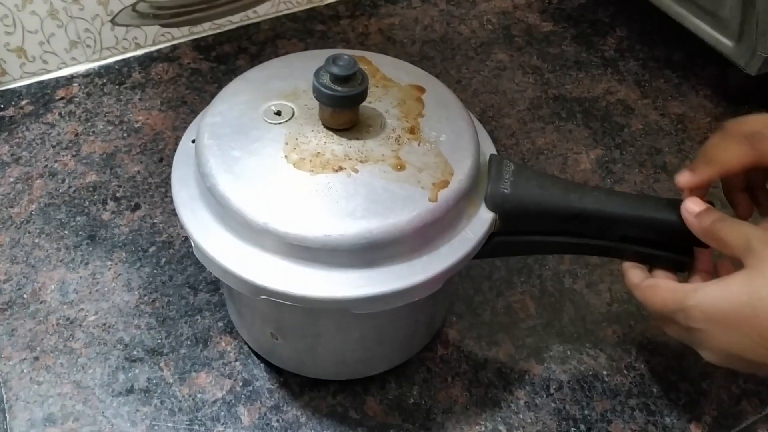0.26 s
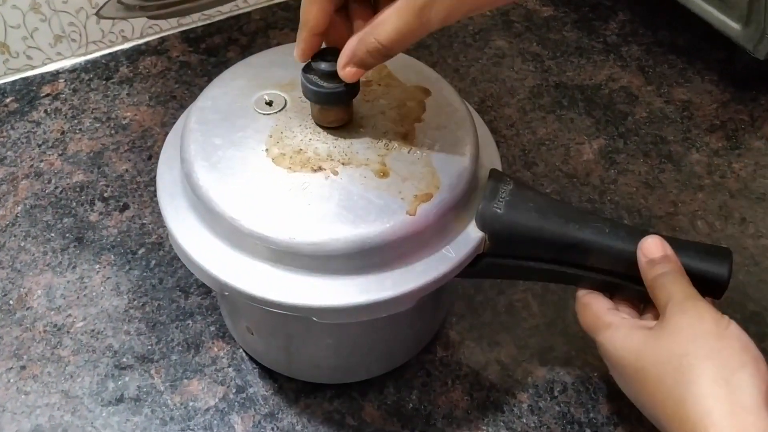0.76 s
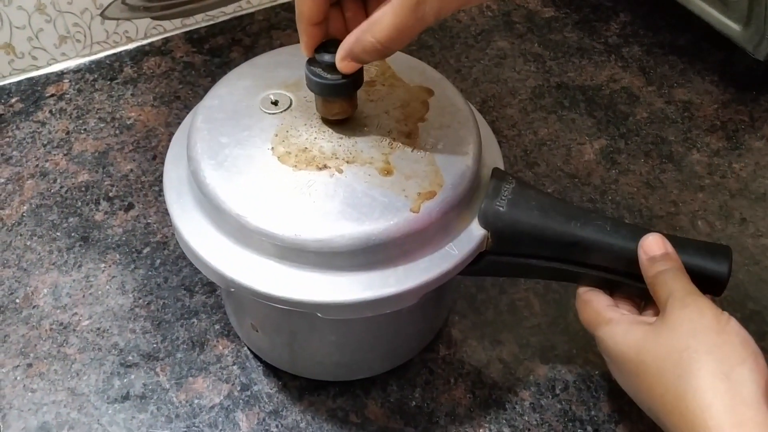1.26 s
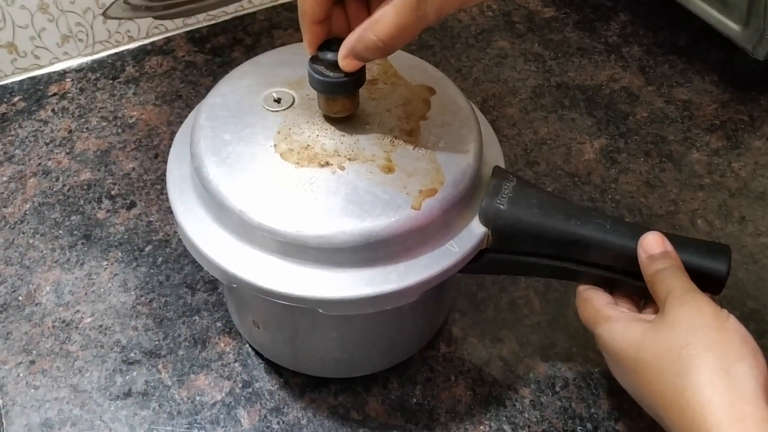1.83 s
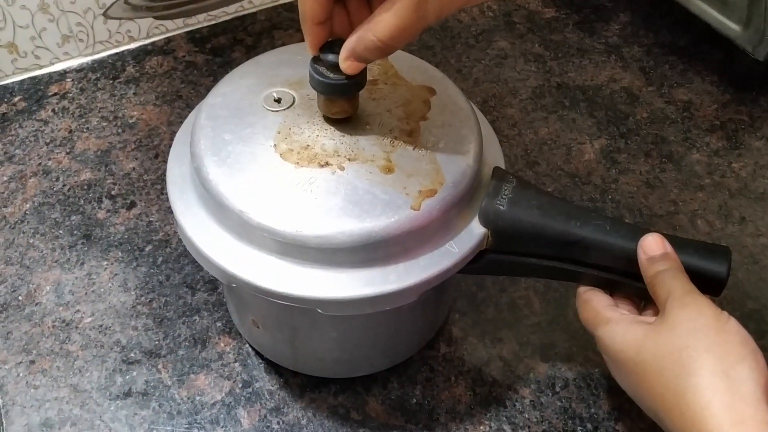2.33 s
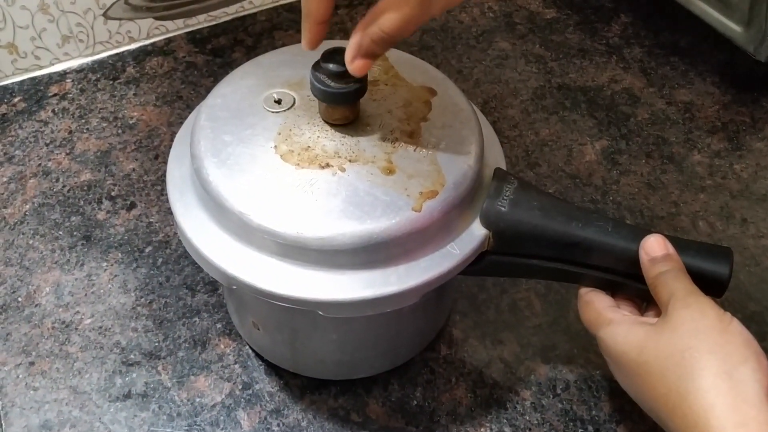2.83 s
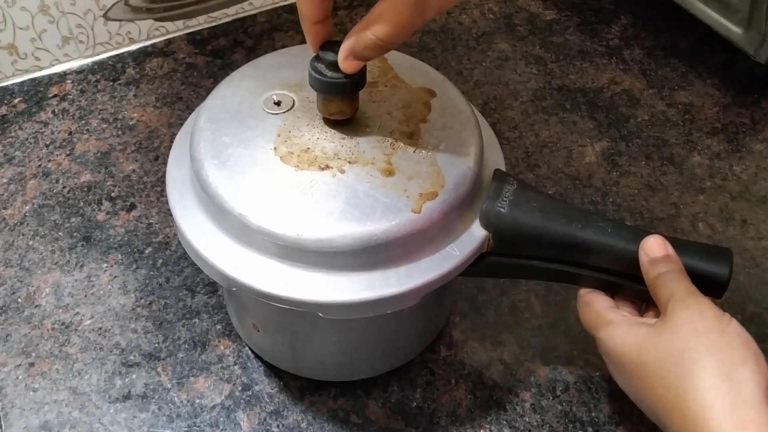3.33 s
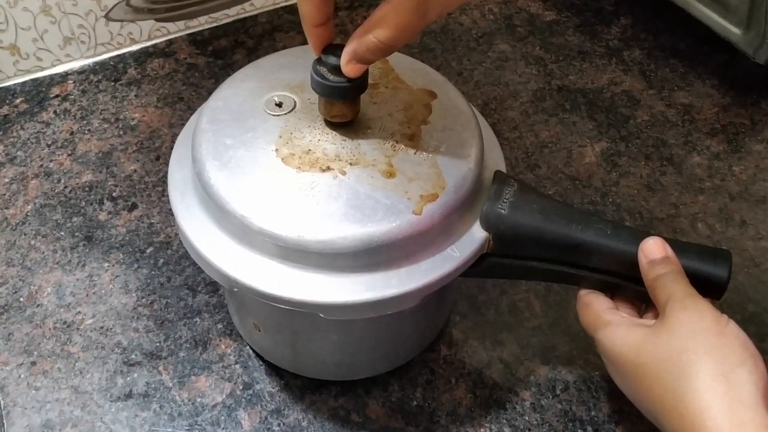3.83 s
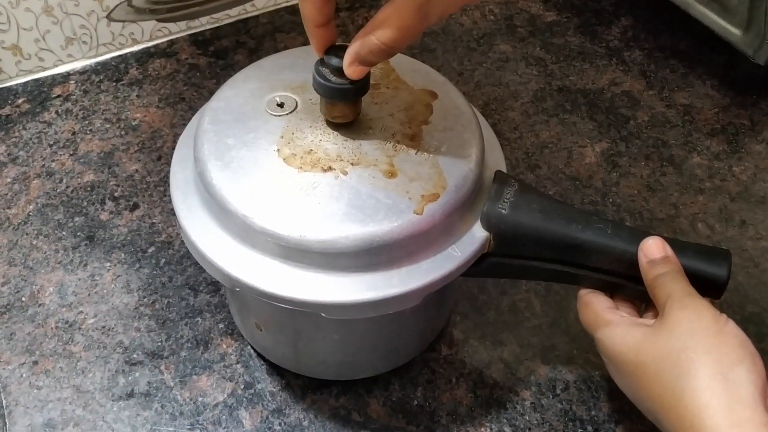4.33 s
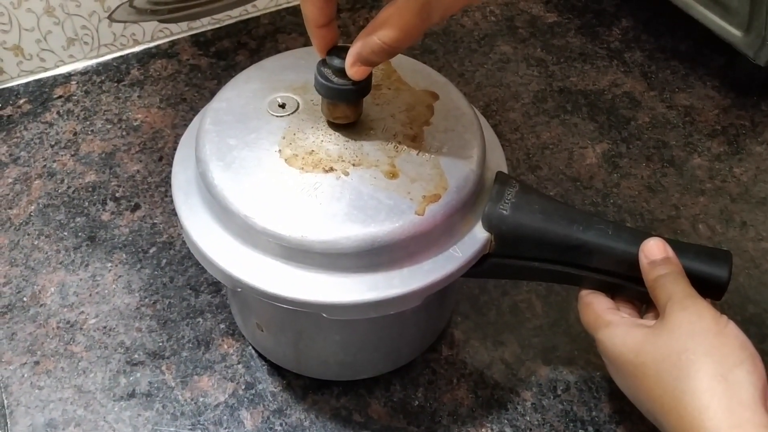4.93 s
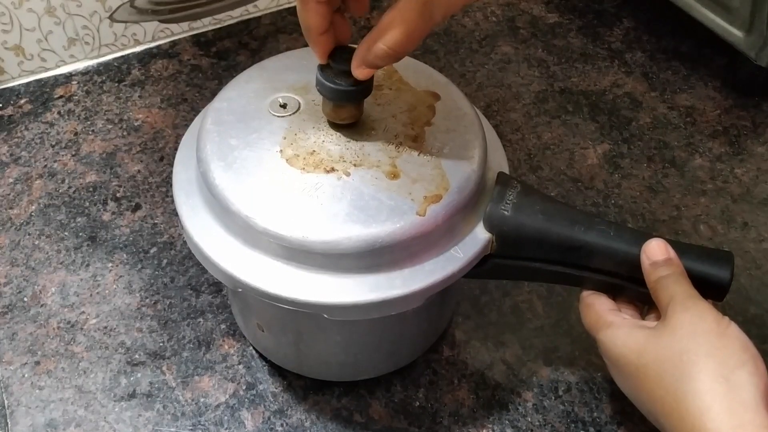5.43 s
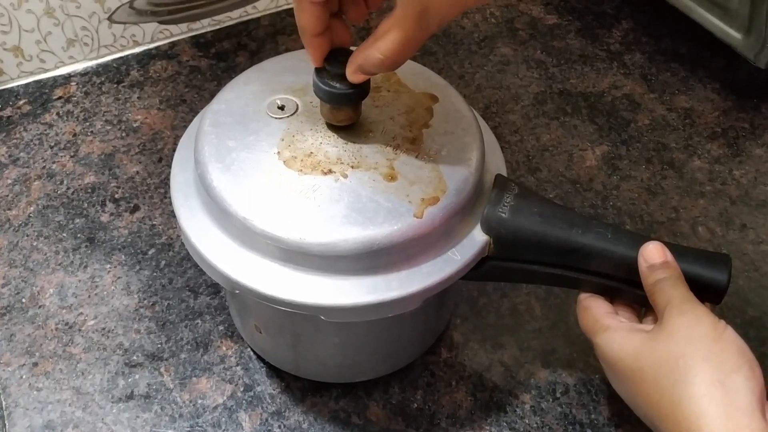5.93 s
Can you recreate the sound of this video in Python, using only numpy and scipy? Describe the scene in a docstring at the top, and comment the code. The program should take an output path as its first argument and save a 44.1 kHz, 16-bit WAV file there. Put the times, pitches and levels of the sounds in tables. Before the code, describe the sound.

In a kitchen, a pressure cooker seeps faintly until its weight is lifted with a click and a bright jet of steam hisses out, steadily fading. The weight drops back with a metallic clunk that briefly rings the lid. After a short pause a second, softer hiss starts and quickly dwindles to a thin, wavering stream with a few tiny spits. The microphone is close, with a low room drone behind.

```python
"""A kitchen counter, with a hand-held mono microphone close to a pressure cooker.
At first a little steam seeps under the seated weight. About a second in, fingers lift the weight:
a turbulent jet hisses from the vent and fades as the pressure falls. The weight drops back with a
clunk that rings the lid. Just after three seconds it is lifted again, and the rest of the steam
runs out, ending in a few spits over the low drone of the kitchen."""
import sys
import numpy as np
from scipy import signal
from scipy.fft import rfft, irfft
from scipy.io import wavfile

SR = 44100
rng = np.random.default_rng(int(sys.argv[2]) if len(sys.argv) > 2 else 0)


def transcribe(signal):
    """Save signal, clipped to [-1, 1], as a 16-bit WAV file at the path in sys.argv[1]."""
    frames = np.atleast_2d(signal).T
    limited = np.clip(frames, -1, 1)
    pcm = np.round(limited * 32767).astype(np.int16)
    wavfile.write(sys.argv[1], SR, pcm)


N = 272097
TIME, BINS = np.arange(N) / SR, np.fft.rfftfreq(N, 1 / SR)
CUT_HZ = 15750

# Lifts of the weight. Each row: lifted, seated again and time to open in seconds, relative level in dB,
# fall in dB per second, top sizzle in dB, ring of the vent pipe in dB.
WEIGHT_LIFTS = [(0.971, 2.621, 0.045, -25, 12.5, -1.5, 0.8), (3.1, 6.5, 0.04, -34, 23.5, -1, -1.44)]
# The bare jet. Each row: frequency in Hz, relative level in dB.
JET_COLOUR = [(60, -49), (200, -28.5), (400, -23.5), (700, -27), (1000, -23), (1600, -23.5), (2800, -16),
              (5000, -12), (7000, -11), (10000, -7.5), (13000, -3.5), (15500, -10.5)]
# Resonances of the vent, the hollow weight and the space above the lid.
# Each row: centre and width in Hz, boost in dB.
VENT_RESONANCES = [(1349, 400.0, 7.9), (1856, 190.0, 5.8), (2164, 210.0, 2.6), (2430, 180.0, 7.9),
                   (2834, 60.0, 3.0), (3218, 240.0, 6.1), (3548, 440.0, 8.9), (4502, 90.0, 4.6),
                   (5167, 110.0, 3.9), (5621, 120.0, 2.5), (5838, 60.0, 3.3), (6081, 120.0, 3.2),
                   (6618, 60.0, 3.2), (6817, 60.0, 3.2), (7338, 200.0, 5.0), (8601, 1500.0, 9.9),
                   (9265, 100.0, 3.1), (9470, 60.0, 1.9), (10426, 190.0, 3.0), (10808, 270.0, 2.2),
                   (11823, 530.0, 4.7), (12753, 1170.0, 5.3), (14011, 160.0, 3.1), (15283, 260.0, 2.7)]
# Whistles of the gap under the weight. Each row: centre and width in Hz, boost in dB per dB of rush.
WHISTLES = [(4540, 52, 0.94), (5200, 140, 0)]
# The weight tips in the fingers and lets more or less steam by.
# Each row: middle and length in seconds, change in dB.
WEIGHT_WOBBLES = [(1.61, 0.06, -0.9), (1.685, 0.03, 2), (3.52, 0.093, 2), (3.7, 0.32, 1.8),
                  (4.14, 0.13, -0.5), (4.93, 0.25, -1.5), (5.29, 0.16, 4), (5.49, 0.28, -2.5),
                  (6.02, 0.13, -3.5)]
# The weight hangs low and steam rushes through a narrow gap.
# Each row: start and end in seconds, rush and top sizzle in dB.
GAP_PINCHES = [(0.93, 1.063, 5.5, 5), (2.423, 2.7, 6.5, 4), (3.05, 3.14, 6, 8), (4.46, 5.18, 3.5, 2)]
# Spits of the dying jet. Each row: start in seconds, relative level in dB.
JET_SPITS = [(5.1, -57), (5.62, -58), (6.047, -56)]
# A weaker jet is duller. Each row: jet strength in dB, dullness in dB per octave,
# then pipe ring, gap rush and top sizzle in dB.
JET_TONES = [(-70, 5, 2, 2, 0.5), (-51, 1.15, 2, -0.5, -2), (-40.5, 1, -1, -2, 2), (-30.5, 0.5, 0.5, -2, 0),
             (-26.5, 0, 6, -1.5, -1)]
# The weight knocks on its stem. Each row: start in seconds, relative level, pot thud and bright tick
# in dB, favoured lid frequency in Hz, its boost in dB.
WEIGHT_KNOCKS = [(0.035, -66, -18, -22, 2450, 20), (0.511, -67, -15, 13, 1310, 3),
                 (1.008, -37.5, -8.5, 5, 740, -7), (2.4717, -44, -34.5, -22.5, 1516, 27),
                 (2.548, -44.5, 1.5, -20, 484, 17), (2.5872, -33, -6.5, 3, 1040, 1),
                 (2.599, -59, 8, -15, 1770, 14), (2.609, -51, 10, -15, 1000, 0),
                 (2.629, -53, -12, -15, 1900, 19), (3.048, -53, -12, -26, 1400, 8.5),
                 (3.1077, -49.5, -16, 11, 1310, 17), (3.153, -62, 18.5, -20, 430, 0),
                 (4.181, -62, -8, -15, 430, 4)]
# Modes of lid and weight. Each row: frequency in Hz, relative level in dB, seconds to fall 60 dB.
LID_MODES = [(434, -9, 0.14), (533, -15, .15), (740, -5, 0.17), (804, -9.5, 0.24), (971, 3, 0.082),
             (1157, 2, 0.073), (1287, -10.5, .11), (1389, -8.5, 0.13), (1590, -9.5, 0.18), (1830, 5, 0.11),
             (1950, -8.5, 0.18), (1800, -9, 0.15), (1990, -8, 0.19), (2244, -3, 0.12), (2600, -4.5, 0.083),
             (2480, -10, .11), (2630, -8.5, 0.066), (3015, -15.5, .16), (4540, -18, 0.13)]
# A knock's clack, the thud of the pot on the counter, and the tick of metal meeting metal.
# Each row: frequency in Hz, relative level in dB.
CLACK_COLOUR = [(100, -1.5), (400, 9), (1100, 3.5), (2500, 8), (3300, -13.5), (5000, -13), (7000, -14),
                (15000, -21)]
THUD_COLOUR = [(60, -18), (150, 5), (260, 1.5), (420, -9), (800, -2), (2000, -40.5)]
TICK_COLOUR = [(500, -10), (3300, -14.5), (4900, 7), (6000, -5), (7200, -6.5), (15000, -15)]
# The airy band above the hollow note swells once. Each row: middle and length in seconds, rise in dB.
AIRY_SWELL = [(1.88, 0.33, 13)]
# Seeping steam, kitchen background and microphone rumble. Each row: frequency in Hz, relative level in dB.
SEEP_SPECTRUM = [(500, -1), (1000, -7), (1700, -7), (2450, -1), (3000, -5), (4500, -0.5), (6500, -3),
                 (7600, -2.5), (10500, 1), (13500, -1), (15500, -0.5)]
KITCHEN_SPECTRUM = [(10, -16), (22, 2.5), (35, -2.5), (65, -7), (150, -8), (230, -8), (330, -4), (450, -10),
                    (600, -17), (1000, -24), (1700, -29), (3500, -30.5), (8000, -32.5), (15500, -35)]
RUMBLE_SPECTRUM = [(5, -16), (15, 3.5), (22, -5), (30, -24.5), (42, -27), (80, -17), (200, -52),
                   (1000, -80.5)]
# Resonances of the kitchen's drone. Each row: centre and width in Hz, boost in dB.
DRONE_RESONANCES = [(43.5, 19, 2.4), (96.4, 18.3, 12.6), (124, 10, 2.7), (181.6, 6.8, 14.3),
                    (247.7, 14, 2.4), (362, 3.4, 6.6), (414, 7.8, 1.9), (764, 19, 2.6), (1400, 90, 4),
                    (2870, 250, 6)]
# The hand moves on the microphone. Each row: middle and length in seconds, rise in dB.
MIC_HANDLING = [(0.22, 0.4, 12), (2.7, 0.3, 10)]
# The kitchen's reverberation. Each row: frequency in Hz, seconds to fall 60 dB.
ROOM_DECAY = [(150, 0.64), (1000, 0.3), (3000, 0.25), (8000, 0.23), (15000, 0.22)]


def jet(flutter_db=0.5, flutter_hz=22, level_db=0.38, weak_share=0.71):
    """Turbulence at the vent, close to the microphone; it flutters and dulls as the pressure falls."""
    hz, t, white = signal.stft(rng.standard_normal(N), SR, nperseg=1024, noverlap=768)
    strength = steam_flow()
    dull, pipe, gap, sizzle = jet_tone(t, strength)
    octaves_down = np.log2(10000 / np.clip(hz, 800, 10000))
    # a weak jet rings the vent less clearly
    clarity = np.interp(np.interp(t, TIME, strength), amp([-59, -50]), [weak_share, 1])[:, None]
    db = spectrum(JET_COLOUR, hz) + clarity * peaks(VENT_RESONANCES, hz) + dull * octaves_down
    db += pipe * bell(3450, 1100, hz) + sizzle * bell(15000, 4400, hz)
    # as the weight sinks towards its seat, the slit rushes and starts to whistle
    db += gap * bell(5300, 3200, hz) + np.maximum(gap, 0) * peaks(WHISTLES, hz)
    # the flow sets the strength of the treble, whatever the colour
    treble = (hz > 7500) & (hz < 15500)
    colour = amp(db) / np.sqrt(np.mean(amp(db) ** 2 * treble, axis=1, keepdims=True))
    hiss = signal.istft(white * colour.T, SR, nperseg=1024, noverlap=768)[1][:N]
    return hiss * strength * amp(level_db + flutter_db * wander(flutter_hz))


def steam_flow(boil_db=-50, boil_fall_db_per_s=3.5, spit_t60=0.23):
    """Jet strength: stored steam runs out fast, the boiling slowly; spits and wobbles ride on top."""
    power = np.zeros(N)
    for lifted, seated, rise_s, db, fall, *_ in WEIGHT_LIFTS:
        age = np.maximum(TIME - lifted, 0)
        stored = amp(db - fall * age)
        boiling = amp(boil_db - boil_fall_db_per_s * age)
        power += vent_opening(lifted, seated, rise_s) ** 2 * (stored ** 2 + boiling ** 2)
    for start, db in JET_SPITS:
        add(power, start, amp(db - 60 * TIME / spit_t60) ** 2)
    return np.sqrt(power) * amp(swells(WEIGHT_WOBBLES))


def vent_opening(lifted, seated, rise_s, sink_s=0.087):
    """How far the vent is open, 0 to 1, as the weight rises and sinks back onto its seat."""
    return np.clip(np.minimum((TIME - lifted) / rise_s, (seated - TIME) / sink_s), 0, 1) ** 2


def jet_tone(t, strength, pinch_edge_s=0.019, pipe_per_rush=-0.68):
    """Dullness, pipe ring, gap rush and sizzle follow the jet's strength and the weight's height."""
    level = 20 * np.log10(np.interp(t, TIME, strength) + 1e-9)
    levels, *columns = np.transpose(JET_TONES)
    dull, pipe, gap, sizzle = (np.interp(level, levels, column) for column in columns)
    for lifted, seated, *_, sizzle_db, pipe_db in WEIGHT_LIFTS:
        held = (t > lifted) & (t < seated)
        sizzle += sizzle_db * held
        pipe += pipe_db * held
    for start, end, rush_db, sizzle_db in GAP_PINCHES:
        pinch = (np.tanh((t - start) / pinch_edge_s) - np.tanh((t - end) / pinch_edge_s)) / 2
        gap += rush_db * pinch
        sizzle += sizzle_db * pinch
        pipe += pipe_per_rush * rush_db * pinch
    return np.array([dull, pipe, gap, sizzle])[:, :, None]


def weight_knocks(focus_width_hz=260, clack_t60=0.095, tick_t60=0.032,
                  pot_hz=231.5, pot_t60=0.16, thud_t60=0.043, thud_rise_s=0.00089):
    """The weight clacks on its stem, rings the lid and, more slowly, shakes the whole pot."""
    t, out = np.arange(SR // 2) / SR, np.zeros(N)
    clack, thud, tick = (noise(spectrum(c, BINS)) for c in (CLACK_COLOUR, THUD_COLOUR, TICK_COLOUR))
    for start, db, thud_db, tick_db, favoured_hz, boost_db in WEIGHT_KNOCKS:
        phases = rng.uniform(0, 2 * np.pi, len(LID_MODES))
        span = round(start * SR) + np.arange(len(t))
        ring = np.zeros(len(t))
        for (hz, mode_db, t60), phase in zip(LID_MODES, phases):
            # where the blow lands decides which modes ring most
            struck_db = mode_db + boost_db * bell(favoured_hz, focus_width_hz, hz)
            ring += amp(struck_db - 60 * t / t60) * np.sin(2 * np.pi * hz * t + phase)
        pot = amp(-5 - 60 * t / pot_t60) * np.sin(2 * np.pi * pot_hz * (t + start))
        counter = thud[span] * amp(-10 - 60 * t / thud_t60)
        body = (pot + counter) * (1 - np.exp(-t / thud_rise_s))
        contact = clack[span] * amp(-8 - 60 * t / clack_t60)
        contact += tick[span] * amp(tick_db - 10 - 60 * t / tick_t60)
        add(out, start, amp(db) * (amp(-13) * ring + amp(thud_db) * body + contact))
    return out


def hollow_note(start_hz=758, end_hz=183.9, sink_s=0.66, grow_db_per_s=5,
                spread_hz=20, airy_ratio=1.25, airy_spread_hz=60):
    """In the first lift, a faint narrow noise band and an airy one above it sink with the pressure."""
    lifted, seated, rise_s, *_ = WEIGHT_LIFTS[0]
    age = np.clip(TIME - lifted, 0, seated - lifted)
    hz = end_hz + (start_hz - end_hz) * np.exp(-age / sink_s)
    phase = 2 * np.pi * np.cumsum(hz) / SR
    note = wander(spread_hz) * np.cos(phase) + wander(spread_hz) * np.sin(phase)
    airy = wander(airy_spread_hz) * np.cos(airy_ratio * phase) * amp(-5 + swells(AIRY_SWELL))
    return (note + airy) * amp(-68.5 + grow_db_per_s * age) * vent_opening(lifted, seated, rise_s)


def seep(level_db=-66.5, fall_db_per_s=4.5, vent_share=0.26):
    """Steam slips under the seated weight: a thin hiss, slowly fading, until the first lift."""
    colour = spectrum(SEEP_SPECTRUM, BINS) + vent_share * peaks(VENT_RESONANCES, BINS)
    lifted, _, rise_s, *_ = WEIGHT_LIFTS[0]
    level = amp(level_db - fall_db_per_s * TIME) * (TIME < lifted + rise_s)
    return noise(np.where(BINS < CUT_HZ, colour, -np.inf)) * level


def reflections(x, delay_s=0.004, early_db=5, early_s=0.011):
    """Dense early bounces off counter and wall, then the kitchen's short tail, treble dying first."""
    hz, t, white = signal.stft(rng.standard_normal(SR // 2), SR, nperseg=256)
    db = early_db * np.exp(-t / early_s) - 60 * t / spectrum(ROOM_DECAY, hz)[:, None]
    tail = signal.istft(white * amp(db) * (t > delay_s), SR, nperseg=256)[1]
    return signal.fftconvolve(x, tail / np.linalg.norm(tail))[:N]


def kitchen_drone(level_db=-61.5):
    """Room tone behind the cooker: a steady low drone with a faint hiss above it."""
    return amp(level_db) * noise(spectrum(KITCHEN_SPECTRUM, BINS) + peaks(DRONE_RESONANCES, BINS))


def handling_rumble(level_db=-63.5, sway_db=3.0, sway_hz=1.8):
    """The hand-held microphone rumbles softly, and more when the hand moves."""
    rumble = noise(spectrum(RUMBLE_SPECTRUM, BINS))
    return rumble * amp(level_db + swells(MIC_HANDLING) + sway_db * wander(sway_hz))


def amp(db):
    """Decibels to gain."""
    return 10 ** (np.asarray(db) / 20)


def spectrum(points, hz):
    """Reads (Hz, value) points on a log-frequency axis."""
    f, value = np.transpose(points)
    return np.interp(np.log(hz + 1), np.log(f + 1), value)


def peaks(rows, hz):
    """The dB boost of a set of resonances."""
    return sum(db / (1 + (2 * (hz - centre) / width) ** 2) for centre, width, db in rows)


def bell(centre, width, x):
    """A bell of height 1 over one region of the spectrum or of time."""
    return 2 ** -((2 * (x - centre) / width) ** 2)


def swells(rows):
    """The dB change over time from a set of smooth swells."""
    return sum(db * bell(middle, length, TIME) for middle, length, db in rows)


def noise(db):
    """Noise of rms 1 with the given dB spectrum."""
    x = irfft(rfft(rng.standard_normal(N)) * amp(db), N)
    return x / np.sqrt(np.mean(x ** 2) + 1e-20)


def wander(rate_hz):
    """Random drift of rms 1, mostly slower than rate_hz."""
    return noise(-10 * np.log10(1 + (BINS / rate_hz) ** 4))


def add(mix, start_s, sound):
    """Mixes a sound in at start_s."""
    part = mix[round(start_s * SR):][:len(sound)]
    part += sound[:len(part)]


def scene(steam_db=-0.5, steam_wet_db=-8, knock_wet_db=-6):
    """Steam and metal up close, the kitchen behind; one microphone feeds both channels."""
    steam, metal = amp(steam_db) * jet(), weight_knocks()
    mix = steam + amp(steam_wet_db) * reflections(steam)
    mix += metal + amp(knock_wet_db) * reflections(metal)
    mix += hollow_note() + seep() + kitchen_drone() + handling_rumble()
    return np.array([mix, mix])


def record(dry):
    """The recorder's band limit: a steep low-pass at CUT_HZ."""
    lowpass = signal.firwin(1023, CUT_HZ, window=("kaiser", 9), fs=SR)
    return signal.oaconvolve(dry, lowpass[None], "same")


dry = scene()
out = record(dry)
transcribe(out)
```